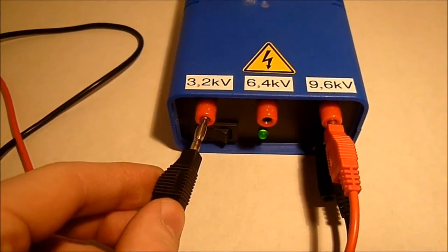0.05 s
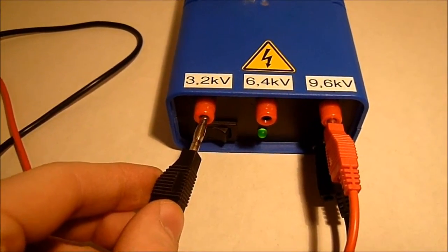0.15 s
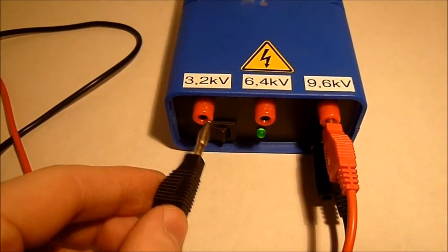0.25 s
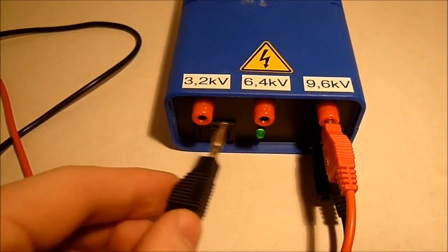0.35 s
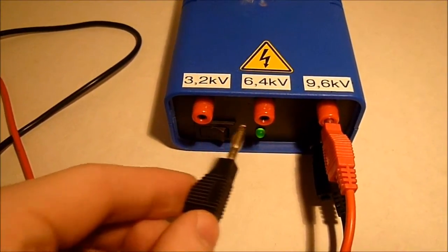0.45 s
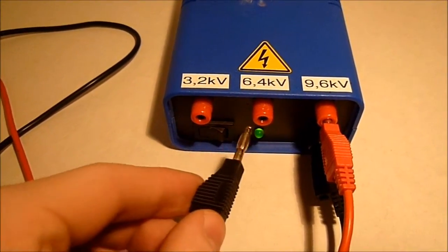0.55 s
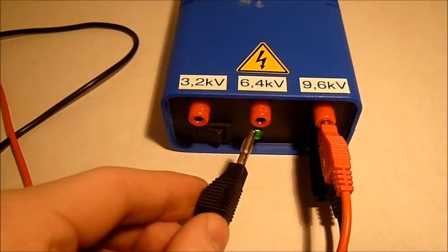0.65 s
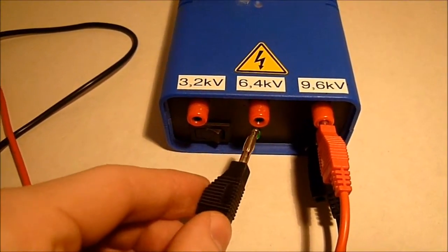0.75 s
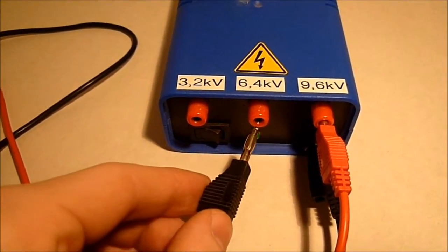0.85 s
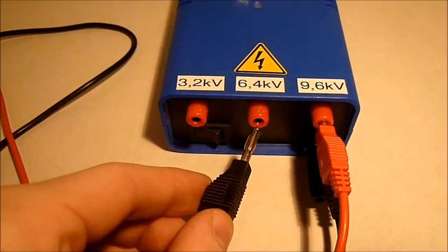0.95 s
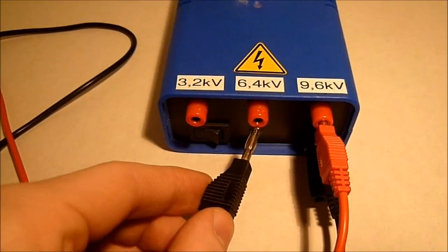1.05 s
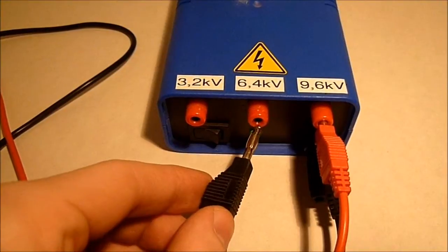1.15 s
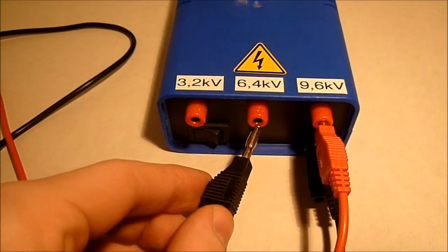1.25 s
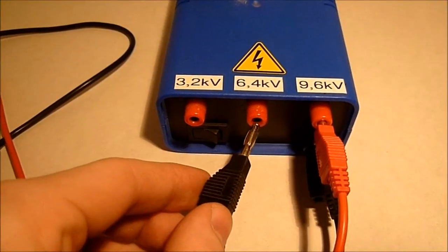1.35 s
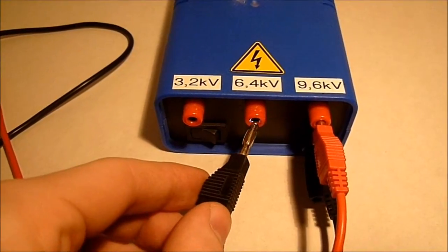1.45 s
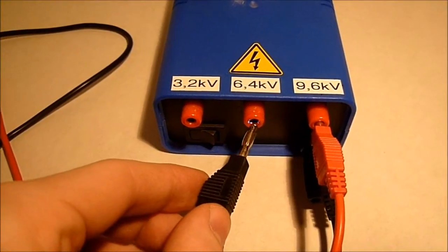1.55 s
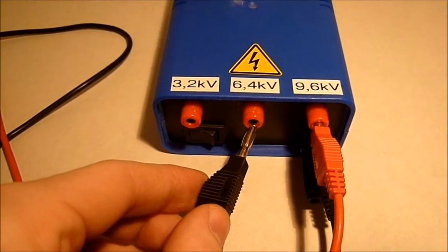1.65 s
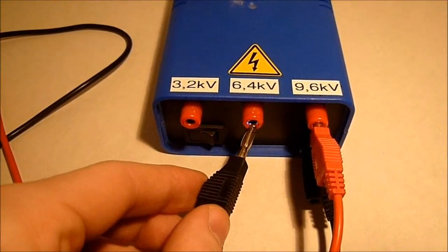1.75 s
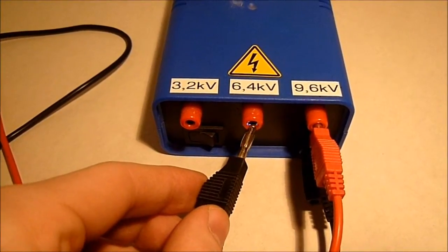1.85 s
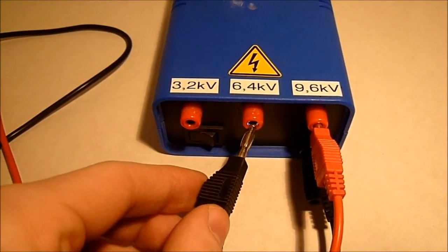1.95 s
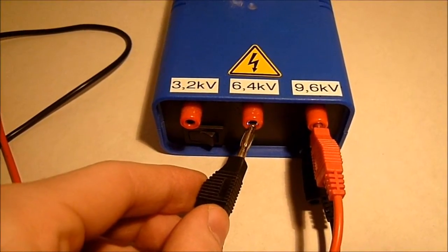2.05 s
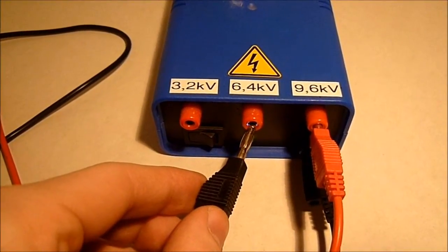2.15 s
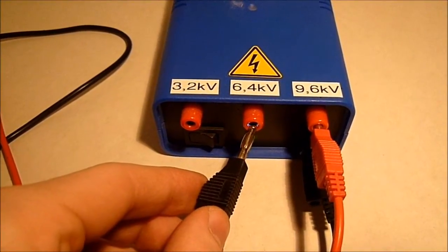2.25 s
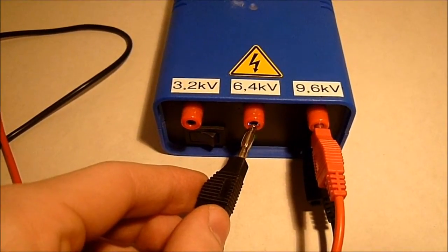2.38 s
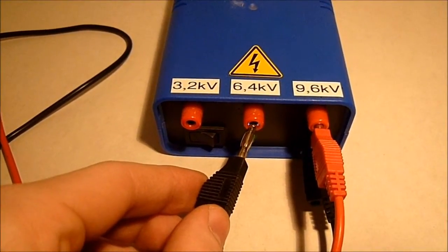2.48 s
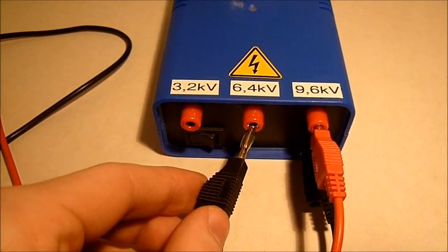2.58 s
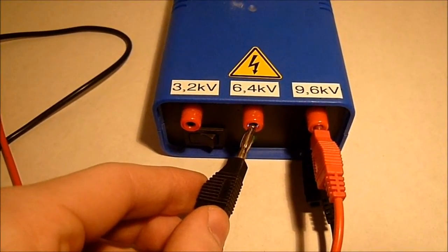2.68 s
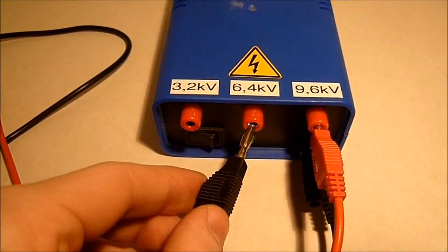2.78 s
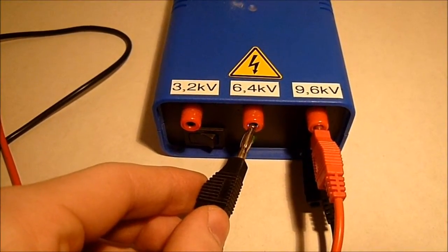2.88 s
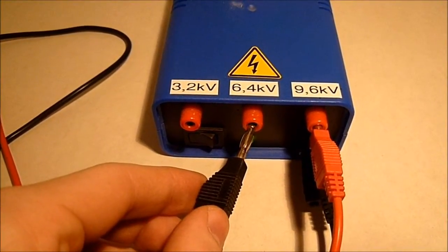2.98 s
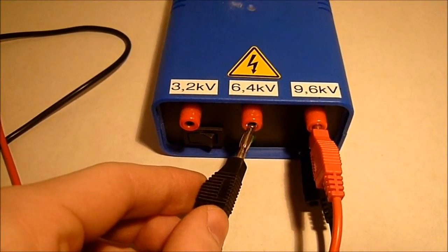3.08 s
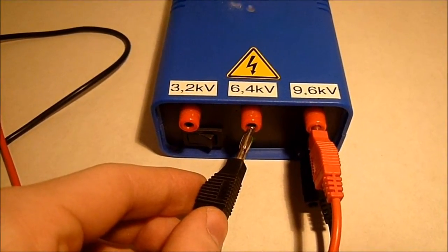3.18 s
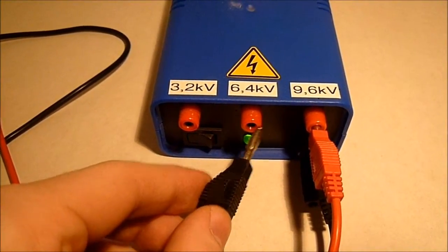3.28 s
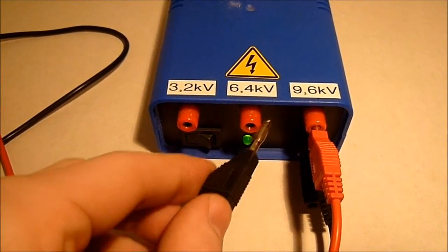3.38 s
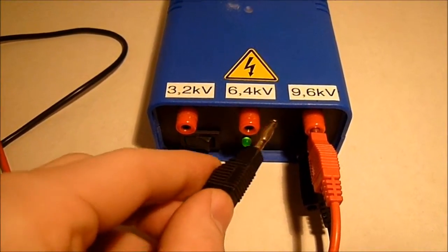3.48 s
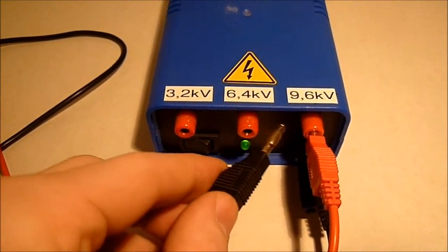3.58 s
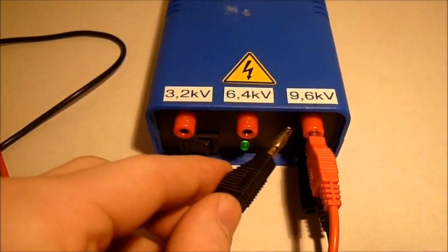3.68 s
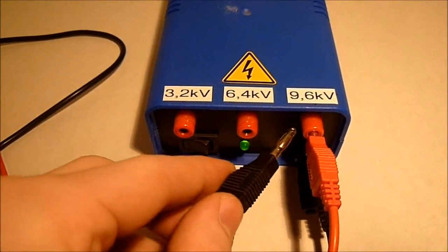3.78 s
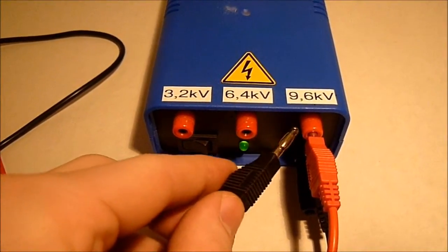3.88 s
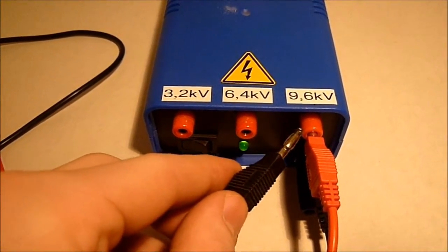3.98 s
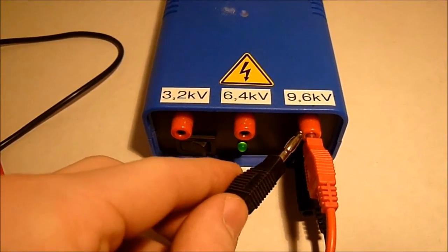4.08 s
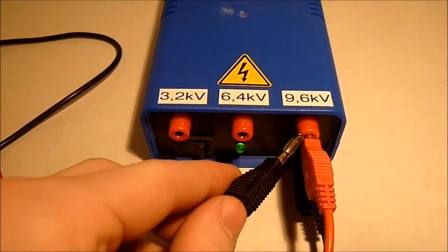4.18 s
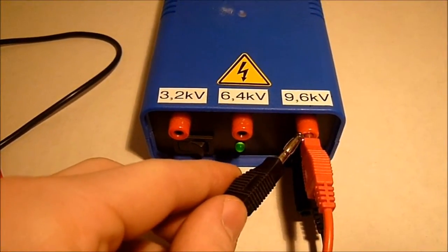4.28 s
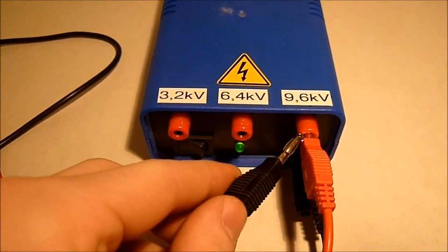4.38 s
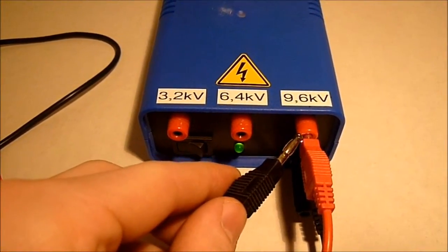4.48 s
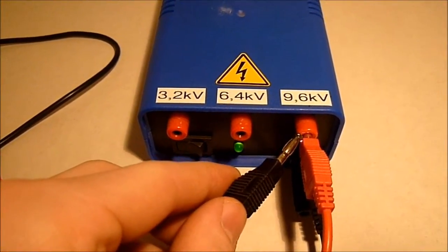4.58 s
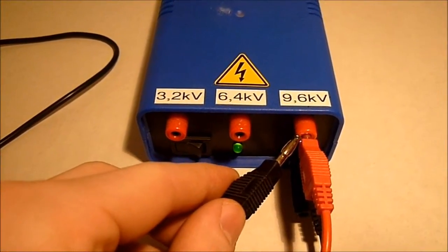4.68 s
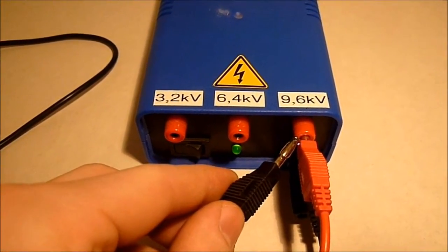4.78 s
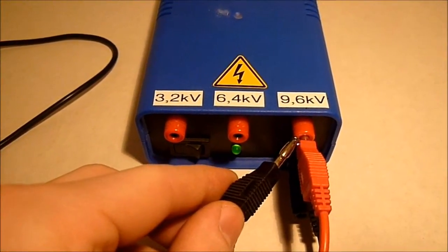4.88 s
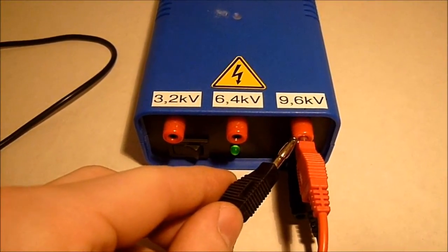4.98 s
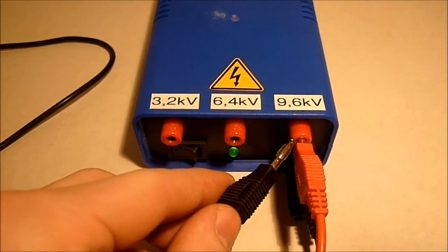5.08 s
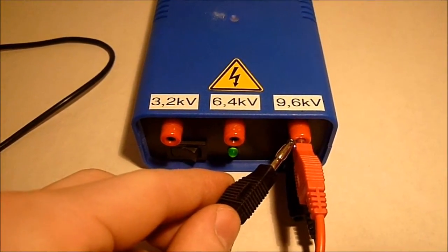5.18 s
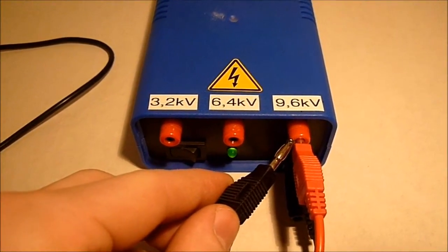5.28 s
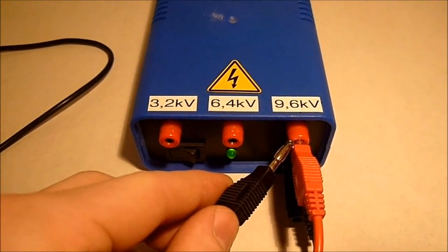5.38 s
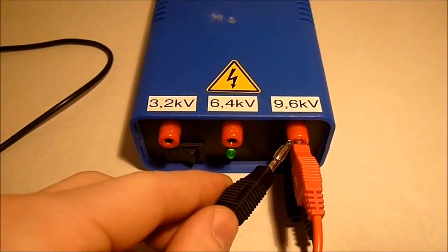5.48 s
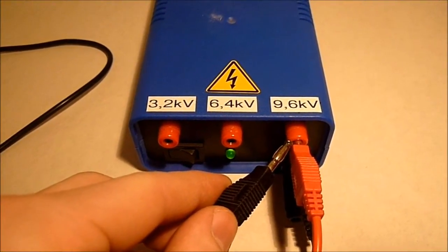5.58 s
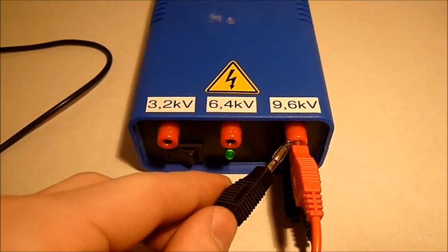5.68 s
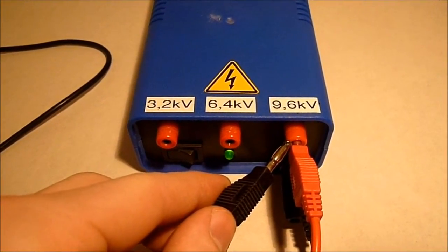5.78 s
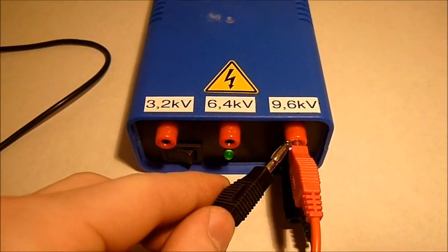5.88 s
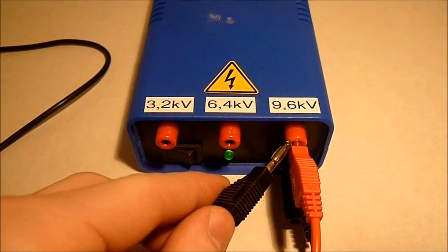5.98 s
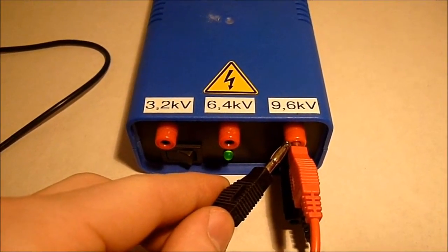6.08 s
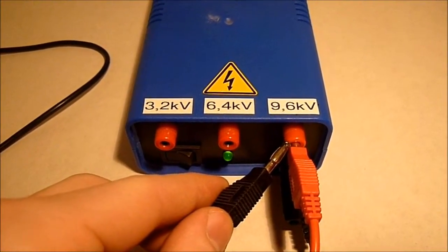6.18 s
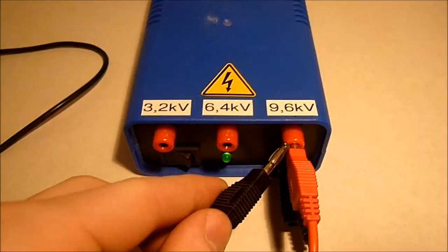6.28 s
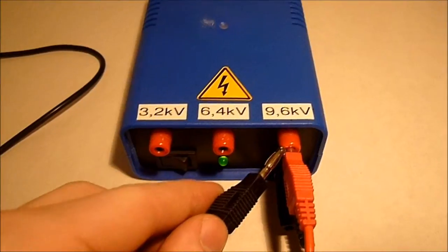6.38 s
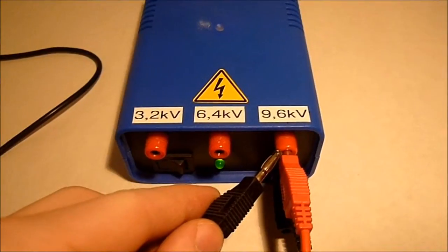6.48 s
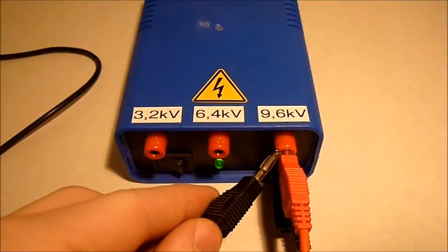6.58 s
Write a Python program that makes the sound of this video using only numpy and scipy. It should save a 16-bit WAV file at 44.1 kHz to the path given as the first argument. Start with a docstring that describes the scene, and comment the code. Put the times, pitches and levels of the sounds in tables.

```python
"""Sparks from a high-voltage generator

A hand holds a test plug near the terminals of a small generator on a table. At the open middle socket the
sparks crowd into a buzz that rings its hollow; at the higher-voltage terminal they jump a wider gap as
separate snaps that sputter out. Each spark is a coloured click with echoes of the case, the hand and a
small room. Shaped noise makes the fizz, the soft knocks and the background; fading tones make one tap."""
import sys
import numpy as np
from scipy import signal
from scipy.fft import rfft, irfft
from scipy.io import wavfile

SR = 44100
rng = np.random.default_rng(int(sys.argv[2]) if len(sys.argv) > 2 else 0)


def master_out(mix):
    """Clip the mix to full scale and print it as 16-bit PCM to the path in sys.argv[1]."""
    frames = np.transpose(np.atleast_2d(mix))
    ceiling = np.clip(frames, -1, 1)
    pcm = np.round(ceiling * 32767).astype(np.int16)
    wavfile.write(sys.argv[1], SR, pcm)


N = 293265  # length of the scene in samples

# colour of the low room noise and of the hiss: (frequency [Hz], relative level per Hz [dB])
ROOM_NOISE_COLOUR = [(29, -42), (50, -11), (86, -5), (210, -1), (273, -3), (462, -5), (609, -4.5),
                     (711, -5), (768, -8.5), (968, -11), (1220, -5), (1490, -15.5), (2000, -19),
                     (2600, -45.5), (4400, -120)]
HISS_COLOUR = [(880, -29), (1500, -5.5), (2900, -5.5), (3090, -4.5), (3310, -6), (5320, -9), (6920, -9),
               (7680, -12), (7900, -18), (10300, -52.5), (17400, -120)]
# how loud each of them is over time: (time [s], level [dB])
ROOM_NOISE_LEVEL = [(0, -52), (1.3, -52.5), (2.702, -56), (3.25, -56), (4.001, -53), (4.299, -63),
                    (5.498, -62), (6.65, -62)]
HISS_LEVEL = [(0, -60), (4.0, -61), (4.298, -58.5), (6.65, -63.5)]

# soft knocks of hand and cable:
# (time [s], level at the strongest point [dB], centre [Hz], width [Hz], length setting [s])
KNOCKS = [(0.143, -48.5, 930, 900, 0.009), (0.752, -47, 140, 220, 0.014), (1.475, -52, 850, 300, 0.016),
          (1.534, -50, 130, 162, 0.022), (2.731, -44.5, 221, 120, 0.01), (2.736, -45.5, 115, 70, 0.02),
          (3.512, -50.5, 5200, 5000, 0.0046), (3.651, -47.5, 410, 380, 0.015),
          (3.671, -50, 170, 220, 0.0065), (5.697, -58, 100, 70, .04)]
# tones of the plug tip tapping the terminal: (frequency [Hz], level [dB], time to fall 60 dB [s])
TAP_TONES = [(1660, -35.5, 0.039), (3520, -40.5, 0.029), (4400, -51, .015)]
TAP_TIME_S = 4.0445

# separate snaps into the open socket, as the plug arrives and leaves: (time [s], relative strength [dB])
SOCKET_SNAPS = [(1.3678, -16.5), (1.4193, -19.5), (1.441, -21.5), (1.461, -22.5), (1.4815, -20),
                (1.5052, -22), (1.5383, -19.5), (1.702, -17), (2.9112, -23), (2.9419, -23), (2.9761, -22.5),
                (3.07, -22.5)]
# the buzz while the plug hovers; a narrower gap fires faster: (time [s], rate [sparks per s])
BUZZ_RATE = [(1.7374, 47.1), (1.887, 101.2), (2.19, 97.8), (2.389, 104.7), (2.517, 136.3), (2.528, 68.8),
             (2.636, 62.6), (2.662, 109.6), (2.718, 102.3), (2.74, 72.2), (2.8829, 65.4)]
# the air in the socket, retuned as the plug moves over its mouth: (time [s], pitch [Hz], ring level [dB])
SOCKET_RING = [(1.37, 4270, 2.5), (1.55, 4230, 3.5), (1.72, 4220, 2), (1.95, 4080, 6), (2.3, 4120, 5.5),
               (2.55, 4140, 5.5), (2.7, 4080, 5), (2.9, 4080, 2), (3.07, 4130, -1)]
# colour of one spark at the socket: (frequency [Hz], relative level [dB])
SOCKET_COLOUR = [(100, -11), (300, -5), (1000, 13), (2000, 20), (2700, 7), (3300, 21.5), (4000, 27.5),
                 (4500, 25), (5000, 13), (5800, 22.5), (6600, 20.5), (7200, 15.5), (7700, -6.5)]
# reflections from case, table and hand near the socket: (delay [s], signed gain [ratio])
SOCKET_ECHOES = [(0.000609, -0.44), (0.000733, 0.14), (0.001018, -0.36), (0.001059, 0.27), (0.001144, 0.3),
                 (0.00135, -0.39), (0.001515, 0.32), (0.001894, 0.39), (0.002045, -0.23), (0.002345, 0.03),
                 (0.003328, 0.072), (0.003547, -0.12)]
# colour of the bare crack that spreads into the room: (frequency [Hz], relative level [dB])
BARE_COLOUR = [(100, -7), (400, 16.5), (1000, 15), (2200, 15.5), (3000, 25), (4000, 16), (5500, 18),
               (7000, 24.5), (7800, 7.5)]
# how long the room's tail lasts: (frequency [Hz], time to fall 60 dB [s])
ROOM_DECAY = [(300, 0.13), (1500, 0.38), (4000, 0.35), (7500, 0.34)]

# separate snaps at the terminal, two on arrival, then the sputtering out: (time [s], relative strength [dB])
TERMINAL_SNAPS = [(4.1027, -14), (4.1856, -18), (5.0373, -25), (5.1334, -24), (5.1565, -26),
                  (5.1759, -28.5), (5.2052, -26.5), (5.2387, -26), (5.3027, -24.5), (5.3483, -24.5),
                  (5.3883, -24.5), (5.5815, -23), (5.6364, -21.4), (5.697, -25), (5.7409, -23.5),
                  (5.7952, -25.5), (5.8668, -23.5), (5.9409, -25.5), (6.0388, -24.5), (6.0946, -23.5),
                  (6.3075, -23.5), (6.3708, -23)]
# the slower rattle across the wider gap at the terminal: (time [s], rate [sparks per s])
RATTLE_RATE = [(4.229, 23.2), (4.293, 33.0), (4.341, 28.4), (4.491, 31.4), (4.515, 42.7), (4.569, 22.2),
               (4.591, 48.0), (4.8, 38.7), (4.874, 42.3), (4.9527, 27.5)]
# colour of one spark at the terminal: (frequency [Hz], relative level [dB])
TERMINAL_COLOUR = [(100, -3), (300, 5), (1000, 14.5), (2000, 14), (2700, 7), (3300, 14.5), (4000, 19.5),
                   (4500, 24), (5000, 29), (5800, 29.5), (6600, 20), (7200, 9), (7700, 0.5)]
# reflections from case, table and hand near the terminal: (delay [s], signed gain [ratio])
TERMINAL_ECHOES = [(0.001197, 0.43), (0.001373, -0.59), (0.00156, 0.41), (0.001867, 0.05),
                   (0.002251, -0.16), (0.002462, 0.093), (0.002596, 0.044), (0.002868, 0.19),
                   (0.003084, -0.32), (0.00312, 0.33), (0.003247, 0.17), (0.007326, 0.099)]

RECHARGE_S = 0.023  # time constant with which the capacitor recharges between sparks
INPUT_OFFSET = 0.015  # constant shift of the sound wave at the input
TOP_HZ = 7980  # upper edge of what the input passes


def amp(db):
    """Turns decibels into gain."""
    return 10 ** (np.asarray(db) / 20)


def evened(x):
    """Scales a sound to an average (rms) strength of 1."""
    return x / np.sqrt(np.mean(x ** 2) + 1e-20)


def read(points, hz):
    """Reads a curve over frequency, joining its points on a logarithmic frequency axis."""
    point_hz, value = np.transpose(points)
    return np.interp(np.log(hz + 1), np.log(point_hz + 1), value)


def follow(curve):
    """Reads a curve over time at every sample."""
    return np.interp(np.arange(N) / SR, *np.transpose(curve))


def add(mix, s, sound):
    """Adds a sound to the mix at time s."""
    start = max(round(s * SR), 0)
    part = mix[start:][:len(sound)]
    part += sound[:len(part)]


def convolve(x, response):
    """Lets every sample of x set off the given response."""
    return signal.oaconvolve(x, response)[:N]


def resonate(x, hz, width_hz):
    """A resonance with gain 1 at its centre, which may move over time."""
    # spin the centre down to 0 Hz, smooth there, then spin it back up
    turn = np.exp(2j * np.pi * np.cumsum(hz * np.ones(len(x))) / SR)
    r = np.exp(-np.pi * width_hz / SR)
    smoothed = signal.lfilter([1 - r], [1, -r], x / turn + 1e-18)
    return 2 * (turn * smoothed).real


def background(spectrum, level, waver_db):
    """Steady coloured noise whose level wavers a little, slower than 20 times a second."""
    hz = np.fft.rfftfreq(N, 1 / SR)
    noise = irfft(rfft(rng.standard_normal(N)) * amp(read(spectrum, hz)), N)
    slow = (hz > 1) * (hz < 20)
    waver = evened(irfft(rfft(rng.standard_normal(N)) * slow, N))
    return evened(noise) * amp(follow(level) + waver_db * waver)


def handling():
    """Dull knocks of hand and cable are swelling, fading noise; the plug's tap is a few fading tones."""
    t = np.arange(SR // 5) / SR
    out = np.zeros(N)
    for s, db, hz, width_hz, length in KNOCKS:
        noise = rng.standard_normal(len(t))
        rub = evened(resonate(resonate(noise, hz, width_hz), hz, width_hz))
        u = 2 * t / length
        swell = u * np.exp(1 - u)  # reaches 1 at half the length setting
        add(out, s, amp(db) * swell * rub)
    tap = sum(amp(db - 60 * t / t60) * np.sin(2 * np.pi * hz * t) for hz, db, t60 in TAP_TONES)
    add(out, TAP_TIME_S, tap)
    return out


def spark_train(rate, full_db, sag_db, sag_s, jitter, scatter_db):
    """Charge, fire, recharge: a longer wait stores more charge, and the supply sags under load."""
    t = np.arange(rate[0][0], rate[-1][0], 1 / SR)
    per_s = np.interp(t, *np.transpose(rate))
    cycles = np.cumsum(per_s) / SR
    count = round(cycles[-1]) + 1
    late, luck = rng.standard_normal((N // 100, 2))[:count].T
    # one spark per cycle, each a little early or late
    s = np.interp(np.linspace(0, cycles[-1], count) + jitter * late, cycles, t)
    wait = np.maximum(np.diff(s, prepend=s[0] - 1 / per_s[0]), 1 / SR)
    charge_db = 20 * np.log10(1 - np.exp(-wait / RECHARGE_S))
    supply_db = full_db - sag_db * (1 - np.exp(-(s - s[0]) / sag_s))
    strength_db = supply_db + charge_db + scatter_db * luck
    return list(zip(s, strength_db))  # rows of (time [s], relative strength [dB])


def discharges(sparks, crooked, spread_s):
    """One impulse a spark; each takes its own crooked path, whose bend is heard a moment later."""
    out = np.zeros(N)
    chances = rng.random((len(sparks), 2))
    for (s, db), (lag, bend) in zip(sparks, chances):
        add(out, s, amp([db]))
        add(out, s + lag * spread_s, amp([db]) * crooked * (2 * bend - 1))
    return out


def crack(colour, echoes, size=4096):
    """One pressure click, followed by its reflections from nearby surfaces."""
    hz = np.fft.fftfreq(size, 1 / SR)
    # minimum phase: the click has its colour but nothing sounds ahead of it
    log_gain = np.log(amp(read(colour, abs(hz))))
    click = np.exp(signal.hilbert(log_gain).conj())
    paths = 1 + sum(gain * np.exp(-2j * np.pi * hz * delay) for delay, gain in echoes)
    return -np.fft.ifft(click * paths).real


def fizz(sparks, level_db, hz=7550, width_hz=800, fade_s=0.0045):
    """A short bright hiss that starts with each spark and fades, different every time."""
    fade = np.exp(-np.arange(SR // 20) / SR / fade_s)
    noise = rng.standard_normal(N) * convolve(abs(sparks), fade)
    return amp(level_db) * resonate(resonate(noise, hz, width_hz), hz, width_hz)


def room(x, near_db, far_db, near_s=0.0045, near_t60=0.049, far_s=0.022):
    """Quick scatter from things on the table, then the tail of the walls, both as fading noise."""
    t = np.arange(SR // 2) / SR
    near = rng.standard_normal(len(t)) * (t > near_s) * amp(-60 * t / near_t60)
    # the tail fades at its own pace in each frequency band
    hz, when, bands = signal.stft(rng.standard_normal(len(t)) * (t > far_s), SR, nperseg=256)
    fading = bands * amp(-60 * when / read(ROOM_DECAY, hz)[:, None])
    far = signal.istft(fading, SR)[1][:len(t)]
    response = amp(near_db) * near / np.linalg.norm(near) + amp(far_db) * far / np.linalg.norm(far)
    return convolve(x, response)


def socket_buzz(firings, width_hz=185, level_db=0.76, spill_db=-6, bare_db=-2):
    """Each spark rings the short air column in the open socket."""
    s, hz, ring_db = np.transpose(SOCKET_RING)
    t = np.arange(N) / SR
    sparks = discharges(firings, crooked=0.13, spread_s=0.00014)
    cracks = convolve(sparks, crack(SOCKET_COLOUR, SOCKET_ECHOES))
    ring = amp(np.interp(t, s, ring_db)) * resonate(cracks, np.interp(t, s, hz), width_hz)
    direct = amp(level_db) * (cracks + ring)
    # the room hears the bare crack and part of what the socket and case make of it
    bare = convolve(sparks, crack(BARE_COLOUR, []))
    outward = amp(spill_db) * direct + amp(bare_db) * bare
    return direct + fizz(sparks, level_db=-6.5) + room(outward, near_db=-12.0, far_db=-16.0)


def input_thumps(sparks, level_db, growth, recovery_s=0.02):
    """Sparks jolt the microphone input off centre, strong ones most, and it drifts back."""
    t = np.arange(SR // 4) / SR
    out = np.zeros(N)
    for s, db in sparks:
        add(out, s, amp(level_db + growth * db) * np.exp(-t / recovery_s))
    return out


def terminal_snaps(firings, level_db=3.5, spill_db=-9, bare_db=1.5):
    """The plugged terminal has no hollow to ring: dry, bright snaps."""
    sparks = discharges(firings, crooked=0.16, spread_s=0.00011)
    direct = amp(level_db) * convolve(sparks, crack(TERMINAL_COLOUR, TERMINAL_ECHOES))
    bare = convolve(sparks, crack(BARE_COLOUR, []))
    outward = amp(spill_db) * direct + amp(bare_db) * bare
    return direct + fizz(sparks, level_db=-5) + room(outward, near_db=-13.0, far_db=-16.0)


def scene():
    """Sparks and handling, over low room noise and microphone hiss."""
    room_noise = background(ROOM_NOISE_COLOUR, ROOM_NOISE_LEVEL, waver_db=0.3)
    hiss = background(HISS_COLOUR, HISS_LEVEL, waver_db=0.5)
    buzz = spark_train(BUZZ_RATE, full_db=-18.0, sag_db=2.5, sag_s=0.16, jitter=0.08, scatter_db=0.5)
    rattle = spark_train(RATTLE_RATE, full_db=-18.5, sag_db=5.0, sag_s=0.24, jitter=0.017, scatter_db=0.68)
    socket = SOCKET_SNAPS + buzz
    terminal = TERMINAL_SNAPS + rattle
    thumps = input_thumps(socket, level_db=-3.5, growth=1.84)
    thumps += input_thumps(terminal, level_db=10.5, growth=2.43)
    mix = room_noise + hiss + handling() + socket_buzz(socket) + terminal_snaps(terminal) + thumps
    return mix[None]


def record(dry):
    """A small camera's sound input: it shifts the wave, flattens peaks beyond 0.9 and cuts the top treble."""
    clipped = np.clip(dry + INPUT_OFFSET, -0.9, 0.9)
    low_pass = signal.firwin(161, TOP_HZ, window=("kaiser", 7), fs=SR)
    return signal.oaconvolve(clipped, low_pass[None], "same")


dry = scene()
out = record(dry)
master_out(out)
```